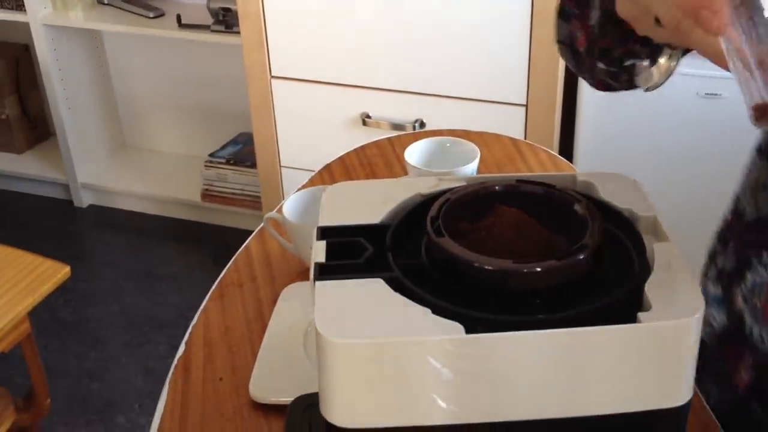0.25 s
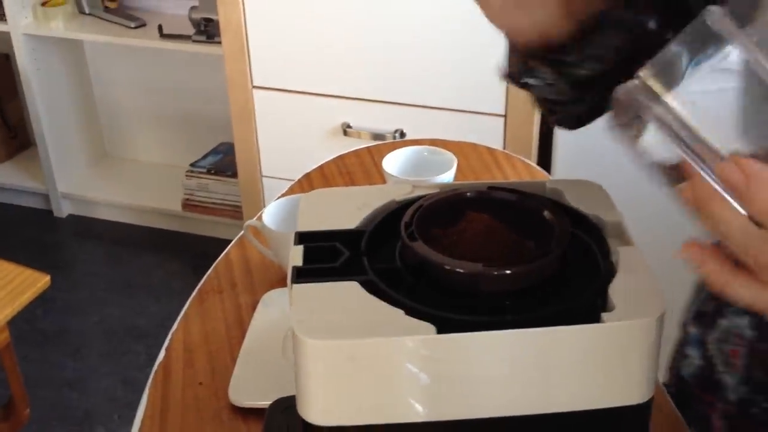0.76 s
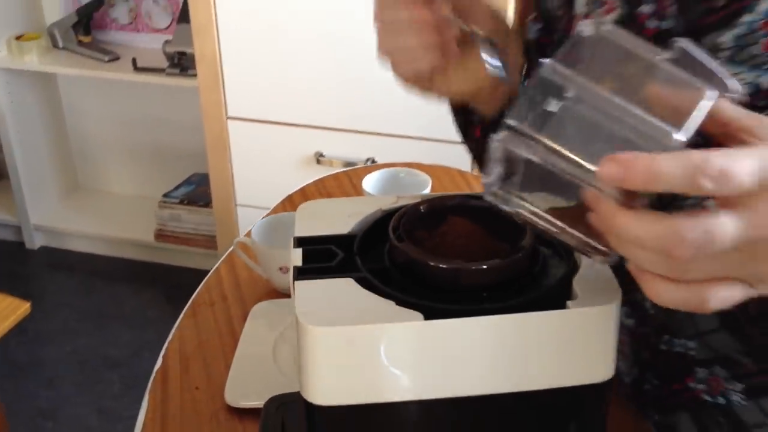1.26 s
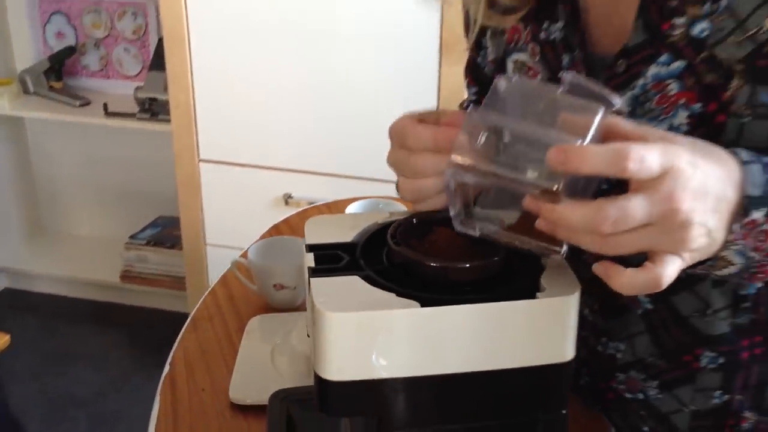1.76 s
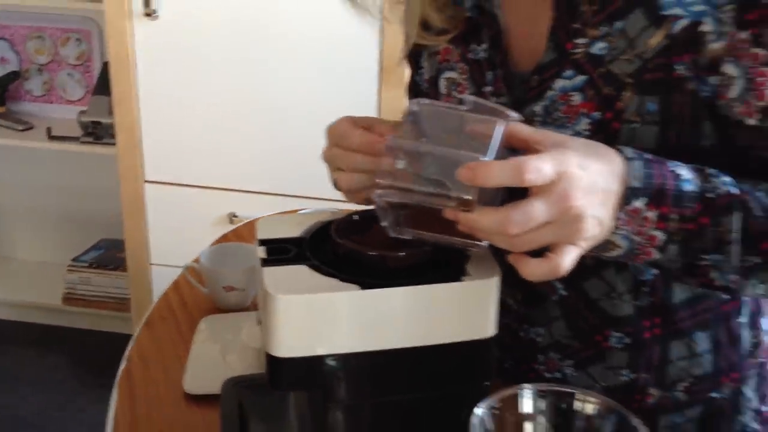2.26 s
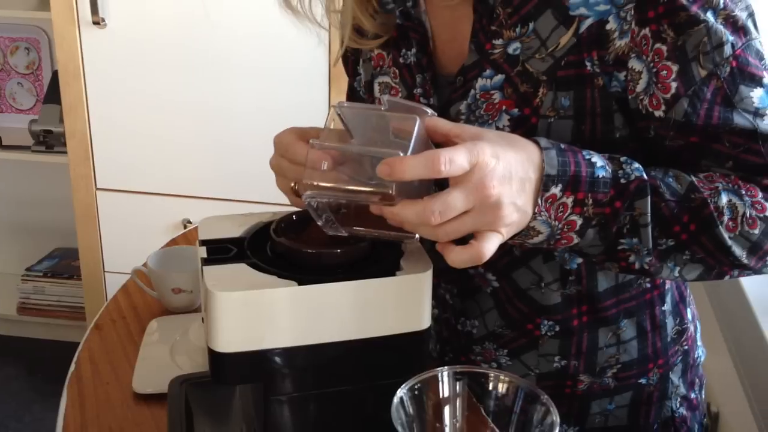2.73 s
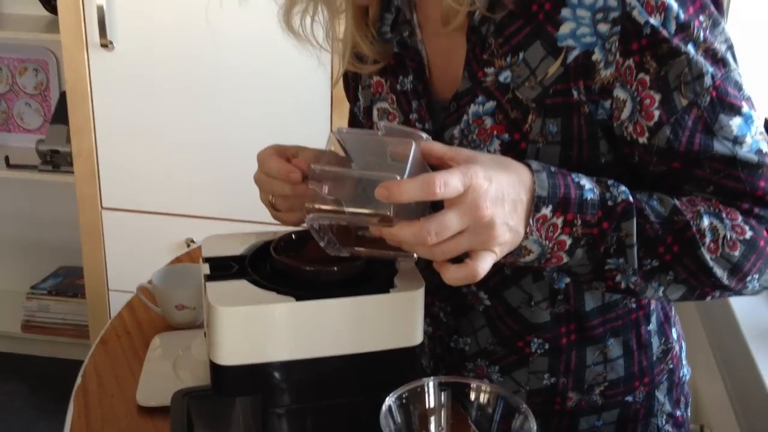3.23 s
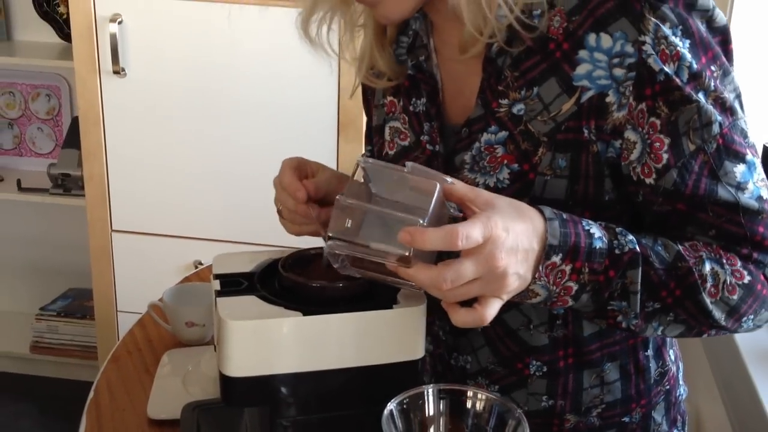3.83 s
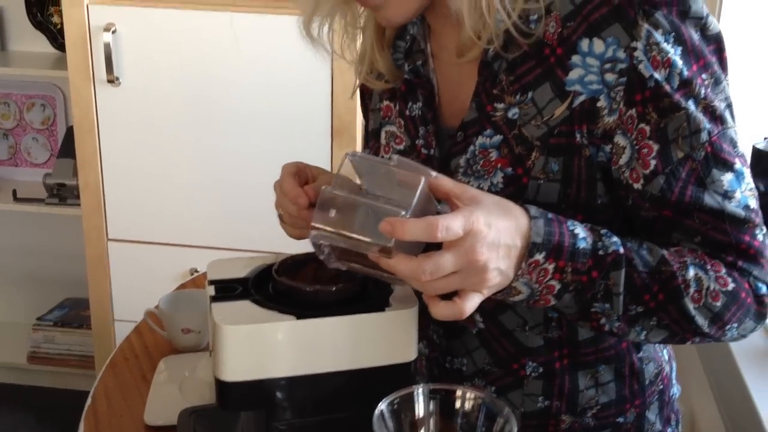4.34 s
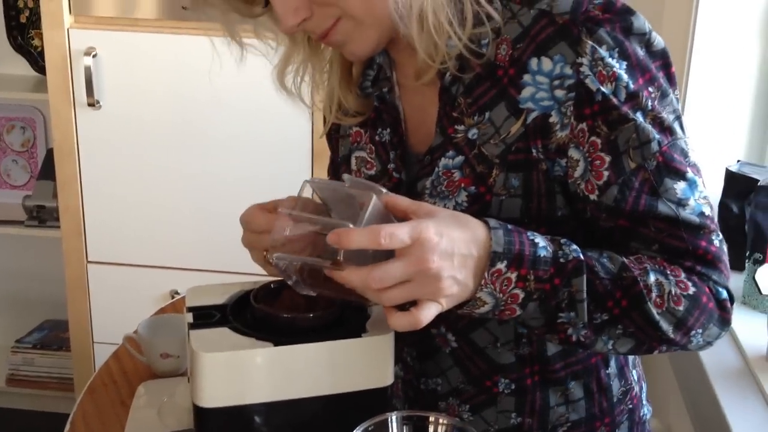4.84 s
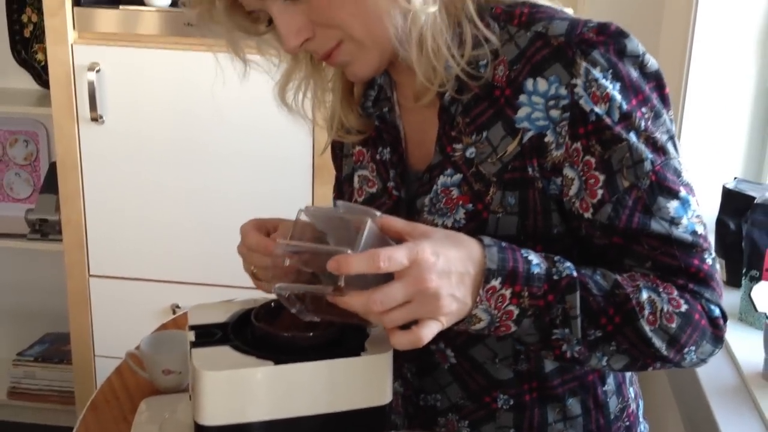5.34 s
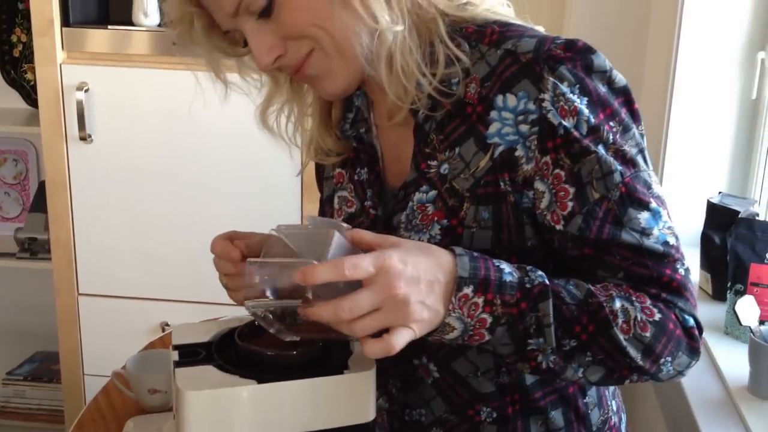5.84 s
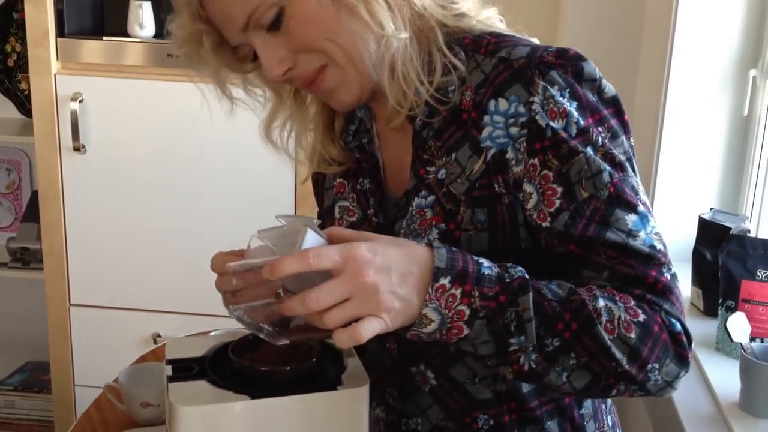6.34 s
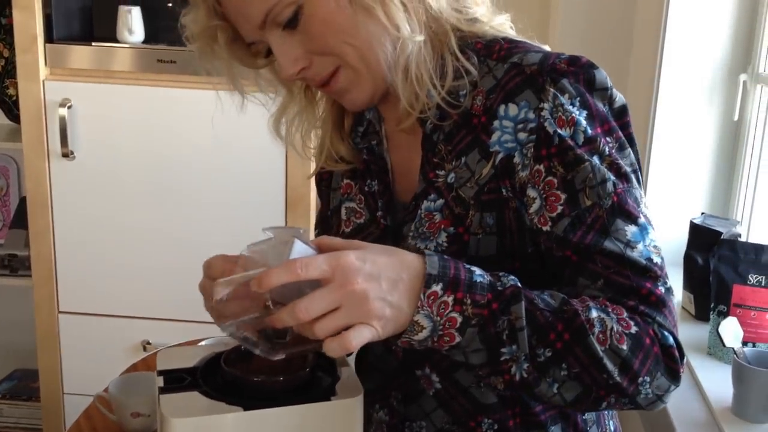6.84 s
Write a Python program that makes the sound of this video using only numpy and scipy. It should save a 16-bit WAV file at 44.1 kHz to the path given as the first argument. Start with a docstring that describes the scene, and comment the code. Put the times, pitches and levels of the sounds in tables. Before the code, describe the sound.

A small, fairly dry kitchen heard close up, with quiet steady air and a very faint low hum that swells and fades. From 0 to 0.7 s sleeves rustle dully, grounds whisper and a spoon ticks lightly on plastic. After a short lull, a sharp hollow clack lands at 1.4 s with a spurt of grounds; more knocks follow at 1.6 and 1.7 s, with a rough scrape and low bumps on the machine until 2.2 s. A soft pour hisses up to a double clack near 2.5 s, then scrape and bump to 2.8 s. It turns sparse: small knocks at 3.3 and 3.8 s, a second sandy pour around 4.2-4.3 s. A strong double knock comes at 4.96 s, followed by light scrapes, ticks and cloth until 5.7 s. After near quiet, four hard, ringing rim taps strike at 6.5, 6.7, 6.9 and 7.0 s, growing louder.

```python
"""In a small kitchen, a metal spoon scoops ground coffee out of a hand-held plastic container into a filter basket.
The spoon knocks (struck shell modes) and scrapes (stick-slip) the walls while sleeves rustle (fibre friction);
grounds hiss as dense random grains, most clearly in two soft pours, and four hard taps on the rim come last.
Now and then the container bumps the coffee machine (two low damped modes).
A faint hum (a wandering sine) comes and goes over steady room air (coloured noise)."""
import sys
import numpy as np
from scipy import signal
from scipy.fft import rfft, irfft, next_fast_len
from scipy.io import wavfile
from scipy.ndimage import uniform_filter1d

SR = 44100
rng = np.random.default_rng(int(sys.argv[2]) if len(sys.argv) > 2 else 0)


def digitize_waveform(pressure):
    """Quantize a signal to 16-bit integers and store it at the path in sys.argv[1].

    Rows of a 2-D input are taken as channels; values are limited to [-1, 1].
    """
    field = np.atleast_2d(pressure).T
    bounded = np.clip(field, -1, 1)
    quanta = np.round(bounded * 32767).astype(np.int16)
    wavfile.write(sys.argv[1], SR, quanta)


N = 312669


def undb(db):
    """Amplitude ratio: decibels to gain."""
    return 10 ** (np.asarray(db) / 20)


def unit(x):
    """Normalisation: scale to rms 1."""
    return x / np.sqrt(np.mean(x ** 2))


def on_log(hz, points):
    """Logarithmic frequency axis: interpolate (Hz, value) points along it."""
    f, value = np.transpose(points)
    return np.interp(np.log(hz + 1), np.log(f), value)


def hump(hz, centre, octaves):
    """Spectral emphasis: a bell curve on a log-frequency axis."""
    return np.exp(-(np.log2((hz + 1) / centre) / octaves) ** 2)


def colour(x, db_at):
    """Minimum-phase filtering: a causal filter whose gain in dB is a function of frequency."""
    n = 2 * next_fast_len(len(x))
    log_gain = np.log(undb(db_at(np.fft.rfftfreq(n, 1 / SR))))
    # folding the cepstrum onto positive times makes the response causal
    cepstrum = irfft(log_gain)
    cepstrum[1:n // 2] *= 2
    cepstrum[n // 2 + 1:] = 0
    response = np.exp(rfft(cepstrum))
    return irfft(rfft(x, n) * response)[:len(x)]


def shaped(x, points):
    """Spectral shaping: colour a sound by (Hz, dB) points."""
    return colour(x, lambda hz: on_log(hz, points))


def resonate(x, peaks):
    """Resonance: pass a sound through (Hz, width Hz, dB) peaks; the small shell radiates little bass."""
    def power(hz):
        return sum(undb(db) ** 2 / (1 + ((hz - f * f / hz) / width) ** 2) ** 2 for f, width, db in peaks)
    return colour(x, lambda hz: 10 * np.log10(power(hz + 1) + 1e-12))


def fade(t, t60):
    """Free damping: exponential decay, 60 dB in t60."""
    return np.exp(-np.log(1000) * t / t60)


def swell(start, length, db, attack, release):
    """Envelope: attack, hold, release; attack and release are the times for 20 dB."""
    t = np.arange(N) / SR - start
    outside = np.maximum(-t, 0) / attack + np.maximum(t - length, 0) / release
    return undb(db - 20 * np.minimum(outside, 10))


def grains(per_s, spread_db):
    """Random impulse process: clicks whose sizes scatter more widely as spread_db grows."""
    size = rng.standard_normal(N) * undb(spread_db * rng.exponential(size=N))
    return size * (rng.random(N) < per_s / SR)


def add(track, s, sound):
    """Superposition: mix a sound in at time s."""
    i = max(int(s * SR), 0)
    track[i:i + len(sound)] += sound[:N - i]


# Spectrum of the room air: frequency_hz, relative_density_db
AIR_SPECTRUM = [(18, -62), (30, -37.5), (105, -21), (130, -16), (148, -6.5), (177, -12.5), (230, -9),
                (639, -19), (691, -12), (1050, -23), (1400, -23.5), (6720, -26.5), (9940, -33),
                (14300, -26.5), (15500, -30)]
# Swells of the faint hum: start_s, length_s, level_db
HUM_SWELLS = [(0.311, 0.2849, -70), (1.94, 0.08225, -73), (2.85, 0.2099, -71.5), (4.71, 0.1383, -73.5),
              (5.14, 0.4737, -69.5), (5.942, 0.322, -71.5)]


def background():
    """Frequency modulation and filtered noise: a slightly wandering hum swells and fades over steady air."""
    hum_hz, wander_hz, air_db = 150.29, 0.71854, -68
    drift = unit(uniform_filter1d(rng.standard_normal(N), SR // 3))
    phase = 2 * np.pi * np.cumsum(hum_hz + wander_hz * drift) / SR
    hum = np.sqrt(2) * np.sin(phase)
    strength = sum(swell(s, length, db, attack=0.15, release=.25) for s, length, db in HUM_SWELLS)
    air = unit(shaped(rng.standard_normal(N), AIR_SPECTRUM))
    return strength * hum + undb(air_db) * air


# Room decay by frequency: frequency_hz, t60_s
ROOM_DECAY = [(200, 0.42513), (600, 0.2637), (1300, 0.23414), (4000, 0.25275), (8000, 0.24085),
              (14000, 0.27)]
# Two early reflections from nearby surfaces: delay_s, level_db
REFLECTIONS = [(.0042, -36), (.0098, -17)]


def kitchen(x, wet_db, build_s):
    """Room reverberation: direct sound, early reflections and a short diffuse tail whose bass lasts longest."""
    t = np.arange(SR // 2) / SR
    noise, hz = rfft(rng.standard_normal(len(t))), np.fft.rfftfreq(len(t), 1 / SR)
    centres, t60s = np.transpose(ROOM_DECAY)
    # overlapping bands of one noise, each with its own decay
    tail = sum(irfft(noise * on_log(hz, np.c_[centres, share])) * fade(t, t60)
               for share, t60 in zip(np.eye(len(t60s)), t60s))
    response = undb(wet_db) * tail * (1 - np.exp(-(t / build_s) ** 2))
    response[0] += 1  # direct sound
    for delay, db in REFLECTIONS:
        response[int(delay * SR)] += undb(db)
    return signal.fftconvolve(x, response)[:N]


# Sleeves brushing as the arms move: start_s, length_s, level_db
ARM_MOVES = [(0, 0.1982, -67.5), (0.254, 0.2123, -75), (0.703, 0.646, -68.5), (2.744, 0.34915, -68.5),
             (3.936, 0.3953, -72.5), (5.552, 0.14635, -66)]
# Spectrum of rubbed cloth: frequency_hz, relative_level_db
CLOTH_SPECTRUM = [(100, -18.5), (220, -1), (400, 0), (700, -8.5), (1200, -9), (2400, -15), (5000, -20.5),
                  (10000, -30.5), (15000, -25.5)]


def sleeves():
    """Fibre friction: many small random contacts rub in a dull rustle while the arms move."""
    motion = sum(swell(s, length, db, attack=0.2451, release=0.14134) for s, length, db in ARM_MOVES)
    rustle = unit(shaped(grains(per_s=7000, spread_db=2.0), CLOTH_SPECTRUM))
    return rustle * motion


# Dull bumps on the machine and its basket: start_s, level_db (upper mode before build-up and decay), pitch_hz
MACHINE_BUMPS = [(1.412, -46, 442.5), (1.716, -50, 400.4), (1.924, -38, 339.4), (2.146, -38.5, 356.4),
                 (2.622, -38, 393.2), (2.768, -50, 373.9), (3.788, -42, 363.2), (4.256, -52, 288.2),
                 (4.961, -47, 243.6), (5.38, -54, 390.3), (5.579, -47.5, 366.5)]


def bumps():
    """Modal excitation: soft contacts slowly build up two low, quickly damped modes of the machine's housing."""
    out, t = np.zeros(N), np.arange(SR // 4) / SR
    envelope = fade(t, 0.07916) * (1 - np.exp(-t / 0.0084))
    for s, db, hz in MACHINE_BUMPS:
        upper_mode = np.sin(2 * np.pi * hz * t)
        lower_mode = undb(-6.5) * np.sin(2 * np.pi * hz * 0.815 * t)
        add(out, s, undb(db) * (upper_mode + lower_mode) * envelope)
    return out


# Slides of grounds that gather and run out: fullest_s, level_db, gather_s (time to rise 20 dB);
# a negative gather_s means already sliding, a little stronger before that time
SLIDES = [(.02, -74, -5.61), (.172, -64, 0.0028), (0.651, -81, 0.9188), (.72, -70.5, 0.1544),
          (1.31, -68.5, 0.8538), (1.9, -66, 0.2368), (2.44, -55, 0.3001), (4.2, -65, 0.0818),
          (4.314, -54, 0.0849), (5.61, -69.5, 0.1862), (5.66, -69, 0.0188)]
# Grounds thrown against the wall by a knock: start_s, level_db
SPILLS = [(1.422, -52.5), (1.735, -73), (2.668, -58)]
# Spectrum of the sliding grounds: frequency_hz, relative_level_db
POUR_SPECTRUM = [(300, -26), (1000, -3.5), (2500, -3), (4500, 0), (7500, 0.5), (10000, -7), (15000, -10)]


def pour():
    """Granular flow: thousands of tiny grains land as a soft hiss, or jump all at once after a knock."""
    sliding = sum(swell(s, 0.0069, db, gather, release=0.07864) for s, db, gather in SLIDES)
    thrown = sum(swell(s, 0.01615, db, attack=.005, release=0.0226) for s, db in SPILLS)
    hiss = unit(shaped(grains(per_s=27000, spread_db=0.0), POUR_SPECTRUM))
    return hiss * (sliding + thrown)


# Strokes of the spoon through the grounds along the wall: start_s, length_s, level_db
STROKES = [(.92, 0.2613, -79), (1.28, 0.05443, -68.5), (1.678, 0.0542, -44), (1.859, 0.04768, -54),
           (1.962, 0.02403, -51.5), (2.041, 0.1058, -65), (2.614, 0.0507, -56), (2.74, 0.1412, -67.5),
           (4.022, 0.214, -84.5), (5.174, 0.04373, -56), (5.251, 0.02989, -59), (5.298, 0.05036, -67),
           (5.58, 0.04416, -58.5), (5.652, 0.0359, -57.5)]
# Wall resonances under the dragging spoon: frequency_hz, width_hz, relative_level_db
RUBBED_WALL = [(580, 150, -12), (920, 170, -3), (1180, 190, 0), (2200, 380, -10), (3200, 500, -17),
               (7000, 4000, -23)]


def scrape():
    """Stick-slip friction: the spoon's edge catches and slips in uneven spurts that drive the pressed wall."""
    spurts = unit(uniform_filter1d(rng.standard_normal(N), size=SR // 80))
    slips = grains(per_s=1800, spread_db=2.2) * undb(3.3 * spurts)
    pressure = sum(swell(s, length, db, attack=0.01915, release=0.025054) for s, length, db in STROKES)
    return unit(resonate(slips, RUBBED_WALL)) * pressure


def attack_rms(x):
    """Onset strength: rms of the first 12 ms."""
    return np.sqrt(np.mean(x[:int(.012 * SR)] ** 2))


def contact(t, spread_s, chatter_db, chatter_t60):
    """Dispersion: one blow as bending waves, treble first, with a brief chatter of metal on plastic."""
    hz = np.fft.rfftfreq(len(t), 1 / SR)
    # bending waves travel as the root of frequency; spread_s is their lag at 1 kHz
    pulse = irfft(np.exp(-4j * np.pi * spread_s * np.sqrt(1000 * hz)), len(t))
    chatter = shaped(rng.standard_normal(len(t)) * fade(t, chatter_t60), [(1000, -6.5), (6000, -3.5)])
    return pulse + undb(chatter_db) * chatter / np.sqrt(np.sum(chatter ** 2))


# Ringing modes of container and spoon: frequency_hz, relative_level_db, t60_s (at damping 1)
RING_MODES = [(546, -14, .19), (610, -18, .08), (790, -17, .05), (856, -14, .1), (911, -15, .1),
              (1015, -6, .13), (1070, -4, .05), (1135, -7, .08), (1246, -6, .1), (1315, -11, .08),
              (1364, -10, .13), (1533, -21, .17), (1783, -22, .15), (1832, -20, .16), (1908, -19, .14),
              (2081, -19, .13), (2219, -19, .11), (2339, -18, .09), (2740, -27, .13), (3230, -19, .07),
              (3610, -22, .13), (3710, -24, .13), (3808, -24, .14), (4168, -20, .11), (4320, -16, .07),
              (4378, -13, .11), (4608, -17, .08), (4700, -18, .07), (6280, -25, .12)]


def ring(t, damping, scatter_db, detune):
    """Modal synthesis: decaying modes whose sizes and pitches vary a little at random from blow to blow."""
    total = np.zeros(len(t))
    for hz, db, t60 in RING_MODES:
        size_chance, pitch_chance = rng.standard_normal(2)
        tone = np.sin(2 * np.pi * hz * (1 + detune * pitch_chance) * t)
        total += undb(db + scatter_db * size_chance) * fade(t * damping, t60) * tone
    return total


# Broad, quickly damped resonances of the plastic shell: frequency_hz, width_hz, relative_level_db
SHELL_PEAKS = [(580, 90, -10), (870, 130, -6), (1050, 150, 0), (1180, 150, -1), (1310, 100, -1),
               (1900, 220, -12), (2300, 420, -11), (3250, 330, -15), (3700, 220, -16), (4800, 600, -15),
               (5700, 400, -20), (6400, 800, -19), (7500, 500, -22), (8600, 900, -23), (12000, 4500, -33)]
# The spoon's own clink: frequency_hz, width_hz
SPOON_PEAK = (4409.8, 625.2)
# Broad noise burst that sounds with each blow: frequency_hz, relative_level_db
BURST_SPECTRUM = [(100, -42.5), (400, -25.5), (600, 2.5), (1100, -5.5), (1600, 1), (2300, -10.5),
                  (2900, 2.5), (4500, -11.5), (5500, -6.5), (8000, -9.5), (10500, -17.5), (15000, -24.5)]


def blows(table, damping, detune, ring_db, spread_s, chatter_db, chatter_t60, burst_db, burst_t60,
          spot_db, spot_ring_db, spot_t60, spoon_db, flex_hz, clack_hz, clack_db, clack_share, thump_db):
    """Impact excitation: each blow rings the shell under a noise burst; spot and contact hardness colour it."""
    out, t = np.zeros(N), np.arange(SR // 4) / SR
    # standing waves build up once the pulse has gone round the walls
    build_up = 1 - np.exp(-t / .005)
    peaks = SHELL_PEAKS + [(*SPOON_PEAK, spoon_db), (350, 350, thump_db)]
    for s, db, spot_hz, flex_db, hardness_db in table:
        shell = resonate(contact(t, spread_s, chatter_db, chatter_t60), peaks)
        modes = ring(t, damping, scatter_db=2.5, detune=detune) * build_up
        spot_mode = np.sin(2 * np.pi * spot_hz * t) * fade(t, spot_t60) * build_up
        burst = shaped(rng.standard_normal(len(t)) * fade(t, burst_t60), BURST_SPECTRUM)
        parts = [(shell, 0), (modes, ring_db), (spot_mode, spot_ring_db), (burst, burst_db)]
        hit = sum(undb(part_db) * part / attack_rms(part) for part, part_db in parts)

        def contact_colour_db(hz):
            """Contact stiffness: the spot favours one region; hard contact raises clack and treble."""
            spot = spot_db * hump(hz, spot_hz, octaves=.3)
            flex = flex_db * hump(hz, flex_hz, octaves=.3)
            clack = (clack_db + clack_share * hardness_db) * hump(hz, clack_hz, octaves=0.5867)
            treble = hardness_db * on_log(hz, [(2400, 0.10044), (5000, 0.813), (12000, 1.152)])
            return spot + flex + clack + treble

        hit = colour(hit, contact_colour_db)
        add(out, s, hit * undb(db) / attack_rms(hit))
    return out


# Spoon against the inside walls: start_s, level_db (rms of first 12 ms), spot_hz (favoured by the struck spot),
# flex_db (wall flexing), hardness_db (hardness of the contact)
KNOCKS = [(.157, -57.5, 1027, 10.5, 6.5), (.277, -52, 856.6, 8, -9), (.445, -52.5, 855.3, 3.5, -7),
          (.544, -59, 832.5, 5.5, -7), (.604, -65.5, 1950, 2.5, -20.5), (.711, -55, 1314, -6, 8.5),
          (1.408, -29, 774.9, 11, 9), (1.419, -44, 599.7, -3.5, -10.5), (1.434, -43, 688.5, 17, -0.5),
          (1.617, -32, 988.6, 4, -1), (1.671, -42, 1044, -5.5, -1), (1.715, -26.5, 1040, 12.5, 7.5),
          (1.726, -32.5, 868.7, 12.5, -14), (1.802, -54, 979.6, 5.5, 17), (1.974, -39.5, 1065, 10.5, -25),
          (1.988, -40, 1115, 18.5, 17.5), (2.144, -46, 1483, 1.5, -1.5), (2.15, -49.5, 834.3, -3.5, -14),
          (2.172, -53.5, 873, 1.5, -10.5), (2.473, -33, 1042, 5.5, 8.5), (2.489, -29, 1012, 18, -3),
          (2.534, -44.5, 977.1, -2.5, 2), (2.62, -42, 1403, 0, -9), (2.631, -44.5, 890.1, -2.5, -8),
          (2.694, -49.5, 1110, 9.5, 4.5), (2.768, -45, 1152, 18.5, -11.5), (3.32, -58, 785.9, 15, -20),
          (3.786, -48, 938.1, 3, -1.5), (3.804, -51.5, 910, 7, -6), (4.035, -65, 875.4, 4, -1.5),
          (4.255, -61.5, 626.5, -7.5, -7), (4.958, -29, 1181, 0.5, -3), (4.963, -28, 879.6, 6.5, -5.5),
          (5.049, -47, 902, 10.5, -4.5), (5.107, -44.5, 1174, 6.5, -5.5), (5.374, -59, 911.2, 9.5, -18),
          (5.571, -53.5, 921.5, -4.5, -24), (5.647, -53.5, 915.3, 18.5, 4), (6.594, -45.5, 1369, -11, -31)]


def knocks():
    """Contact damping: a spoon that stays against the wall shortens the ringing."""
    return blows(KNOCKS, damping=1.646, detune=0.017473, ring_db=-10, spread_s=0.0010128,
                 chatter_db=9.5, chatter_t60=0.027125, burst_db=-7.5, burst_t60=0.067,
                 spot_db=12.0, spot_ring_db=-7.5, spot_t60=0.052835, spoon_db=-17.0, flex_hz=589.21,
                 clack_hz=2396.2, clack_db=4.5, clack_share=0.52, thump_db=-21.5)


# Spoon struck hard on the rim: start_s, level_db (rms of first 12 ms), spot_hz (favoured by the struck spot),
# flex_db (wall flexing), hardness_db (hardness of the contact)
RIM_TAPS = [(6.525, -23.5, 1300, 1.5, -4), (6.699, -22.5, 1246, -0.5, -18.5), (6.863, -15.5, 1015, 2, 0.5),
            (7.033, -14.5, 1060, 1.5, -0.5)]


def taps():
    """Free vibration: a spoon that bounces off the rim lets both spoon and container ring."""
    return blows(RIM_TAPS, damping=1.0, detune=0.003815, ring_db=-12, spread_s=0.0011315,
                 chatter_db=6.0, chatter_t60=0.02829, burst_db=-13, burst_t60=0.089,
                 spot_db=3.5, spot_ring_db=-22, spot_t60=0.03, spoon_db=-8.0, flex_hz=531.5,
                 clack_hz=1995, clack_db=3.3224, clack_share=0.2744, thump_db=-28)


def scene():
    """Superposition: spoon, container, grounds and sleeves sound in the room, over its air and hum."""
    sources = sleeves() + bumps() + pour() + scrape() + knocks() + taps()
    return (background() + kitchen(sources, wet_db=-40, build_s=0.00854))[None]


def record(dry):
    """Band limiting: a steep elliptic low-pass removes the treble above 15.5 kHz."""
    return signal.sosfilt(signal.ellip(10, .2, 80, 15500, fs=SR, output="sos"), dry)


dry = scene()
out = record(dry)
digitize_waveform(out)
```